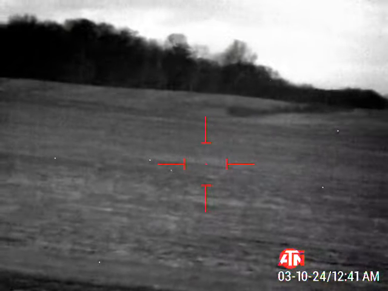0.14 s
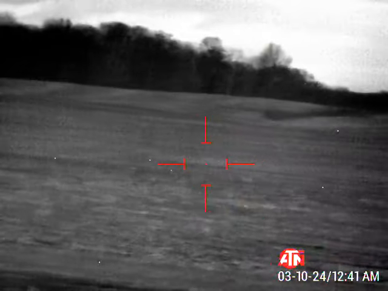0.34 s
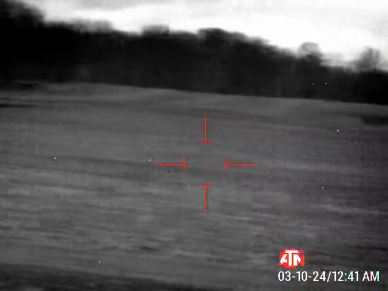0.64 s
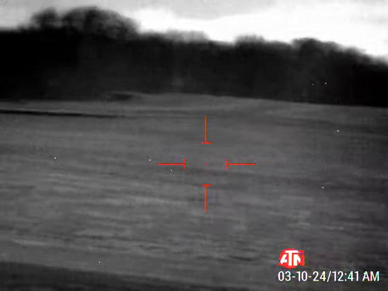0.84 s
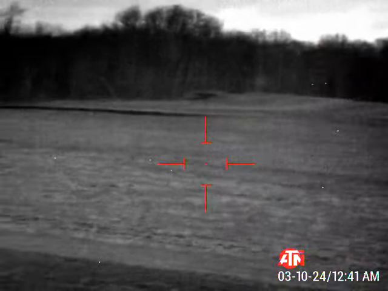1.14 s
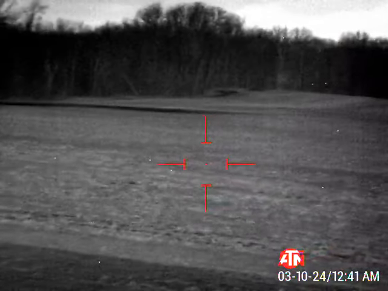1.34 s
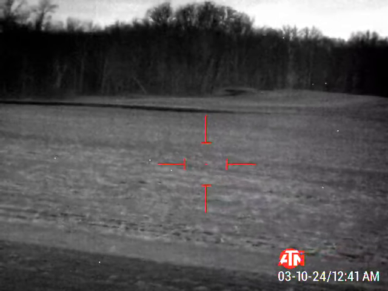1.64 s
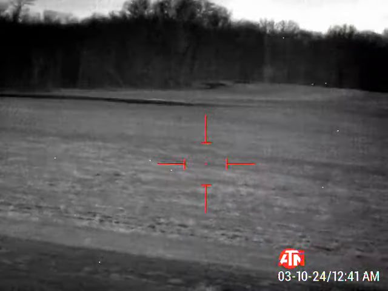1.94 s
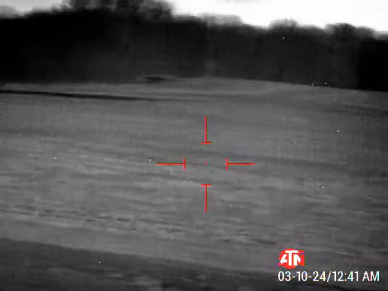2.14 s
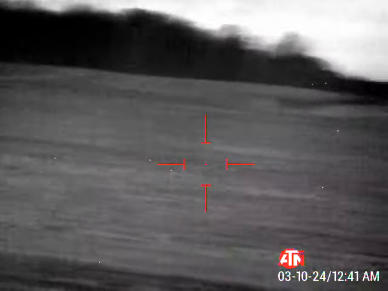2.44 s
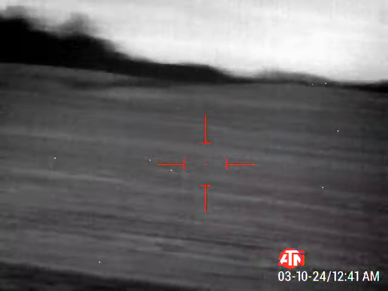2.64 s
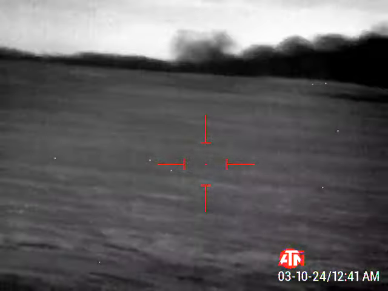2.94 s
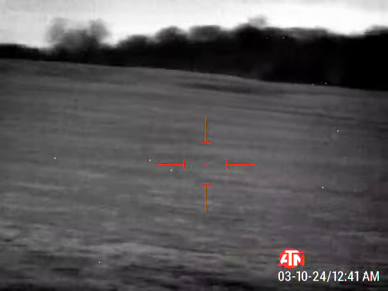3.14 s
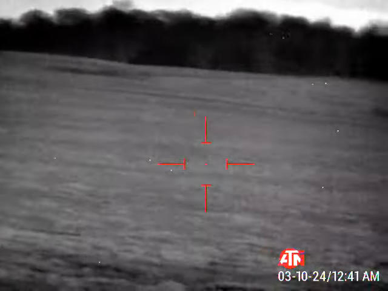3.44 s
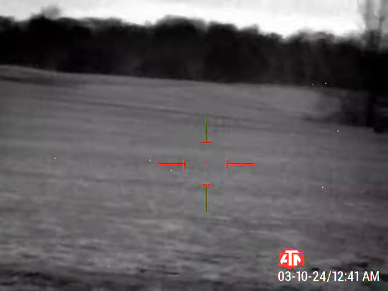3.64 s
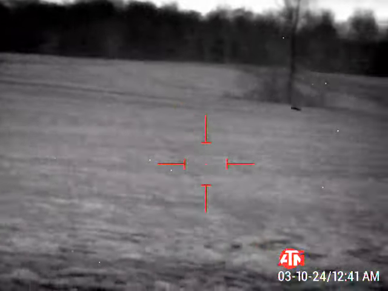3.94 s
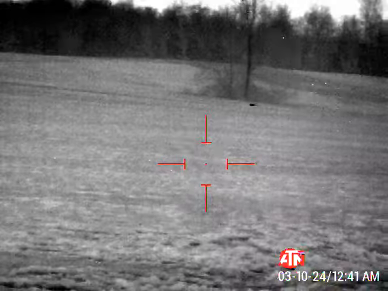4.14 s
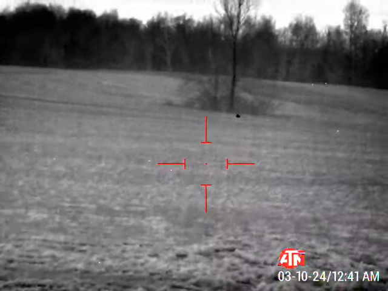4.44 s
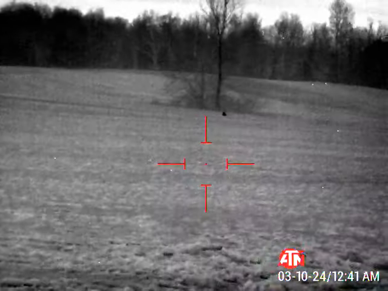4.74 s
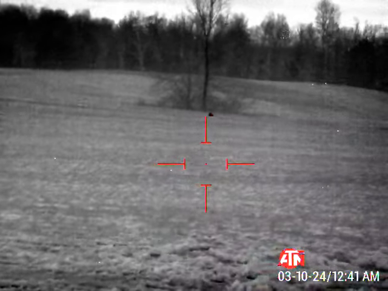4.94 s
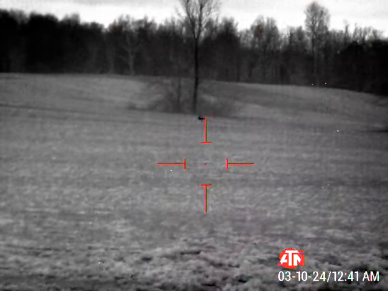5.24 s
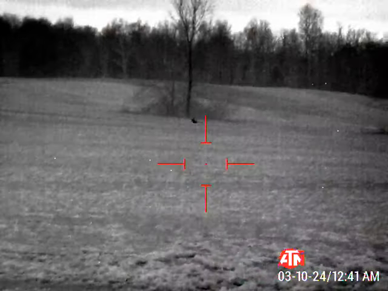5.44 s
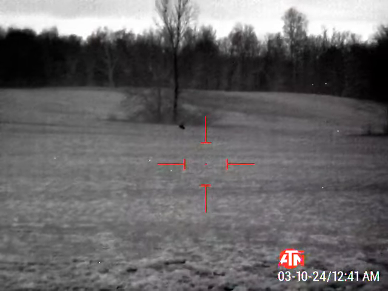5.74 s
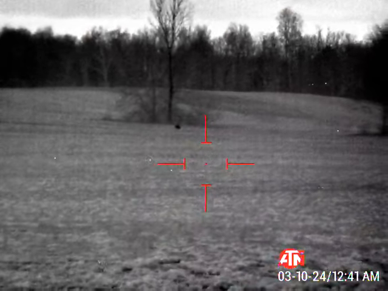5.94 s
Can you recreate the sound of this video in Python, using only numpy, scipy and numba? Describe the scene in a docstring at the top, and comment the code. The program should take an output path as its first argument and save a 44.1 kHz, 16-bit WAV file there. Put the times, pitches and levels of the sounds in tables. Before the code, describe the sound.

Outdoors at night in a field ringed by woods, the tail of a rifle shot sizzles and rolls away. A wounded coyote yelps some way off, short high arching cries with hoarse edges. Midway a muffled self-loading rifle fires once, close to the microphone, thumping and clattering. Its echo hisses over stubble, then rolls from the trees as the yelping continues. A small recorder ducks at loud sounds and its hiss swells back.

```python
"""A wounded coyote yelps across a night field ringed by woods: overtones of an arching pitch, hoarse at both ends.
A muffled self-loading rifle fires once, close to the microphone, as short bursts of thump and steel noise.
The bullet's shock wave sizzles back off the stubble with a sinking rumble, then the woods return a long, dulling roll.
The same echoes, from a shot fired just before the start, fill the first seconds.
The recorder's gain control ducks under loud sounds, so the roll and the hiss swell up between the yelps."""
import sys
import numpy as np
from scipy import signal
from scipy.fft import rfft, irfft, next_fast_len
from scipy.io import wavfile
from scipy.ndimage import uniform_filter1d, map_coordinates
from numba import njit

SR = 44100
rng = np.random.default_rng(int(sys.argv[2]) if len(sys.argv) > 2 else 0)


def generate_wav(sig):
    """Save sig (samples, or channels by samples) to the path in sys.argv[1] as 16-bit PCM at SR."""
    pcm = np.round(np.clip(np.atleast_2d(sig).T, -1, 1) * 32767).astype(np.int16)
    wavfile.write(sys.argv[1], SR, pcm)


N = 267863
T = np.arange(N) / SR  # time [s]

# firing times of the two shots, the first just before the start: [s]
SHOT_TIMES = [-0.13, 3.432]


def amp(db):
    """Decibels to amplitude."""
    return 10 ** (np.asarray(db) / 20)


def unit(x):
    """x scaled to rms 1."""
    return x / np.sqrt(np.mean(x ** 2) + 1e-20)


def ramp(x):
    """x held within 0-1."""
    return np.clip(x, 0, 1)


def along(points, hz):
    """(Hz, value) points read at hz on a log axis."""
    f, v = np.transpose(points)
    return np.interp(np.log(hz + 1), np.log(f + 1), v)


def curves(rows, t):
    """Each column after the time, read at times t."""
    s, *cols = np.transpose(rows)
    return [np.interp(t, s, c) for c in cols]


def during(start, length):
    """1 while a sound lasts, with soft edges."""
    inside = (T >= start) & (T <= start + length)
    return uniform_filter1d(inside * 1.0, size=400)


def wobble(rate):
    """A smooth random curve, rate knots a second."""
    knots = rng.standard_normal(int(N * rate / SR) + 4)
    return map_coordinates(knots, [T * rate])


def filtered(x, response):
    """x times a gain that depends on frequency."""
    m = next_fast_len(len(x) + 8192)
    gain = response(np.fft.rfftfreq(m, 1 / SR))
    return irfft(rfft(x, m) * gain, m)[:len(x)]


def noise(spectrum):
    """Coloured noise of rms 1."""
    return unit(filtered(rng.standard_normal(N), lambda hz: amp(along(spectrum, hz))))


def burst(spectrum, s, hold, t60):
    """A blast of coloured noise at time s that holds, then dies; its energy is that of its envelope."""
    t = T[:SR // 8]
    shape = amp(-60 * np.maximum(t - hold, 0) / t60)
    puff = np.pad(shape * rng.standard_normal(len(t)), (round(s * SR), N))[:N]
    blast = filtered(puff, lambda hz: amp(along(spectrum, hz)))
    return blast * np.linalg.norm(shape) / np.linalg.norm(blast)


def coyote():
    """Each yelp breaks in hoarsely, arches through a clear tone of overtones and breaks up again."""
    # one pitch arch a cry; where two overlap, the voice splits into two strands:
    # (start [s], length [s], level [dB], attack [s], first pitch [Hz], top pitch [Hz], last pitch [Hz],
    #  place of the top [share of length], hoarse onset [s], least roughness [0-1],
    #  brightness [dB per octave of overtone number], mouth region [Hz], mouth lift [dB])
    yelps = [ (1.141,.26,-19,0.074,610,705.4,578,0.47,0.087,0,0.5,3540,8.5),
             (1.56,0.3,-22,0.042,735,930,727,.64,0.11,0.16,2,3600,8.5),
             (2.073,0.29,-26,0.076,857,984,854,0.53,.05,0.17,4,4150,0),
             (2.134,.13,-32,0.06,904,1132,1070,0.69,0.017,0.4,13,3400,6),
             (2.598,0.3,-21,.11,762,1002,804,0.57,0.099,0.19,-3.5,3710,15),
             (2.865,.32,-47.5,0.019,766,804,770,0.23,.05,0.96,-8,4300,1),
             (3.158,0.23,-33.5,0.037,586,672,563,0.49,.07,0.3,-0.5,2900,-20),
             (4.156,0.25,-16.5,0.077,776,854,836,0.41,0.067,0.02,5,2680,2),
             (4.497,.09,-17,0.032,730,720,665,0.35,.05,0.9,6,4300,6),
             (4.837,.275,-19.5,0.044,1005,1244,1070,.83,.035,0.16,1,2550,4),
             (5.097,0.099,-38.5,0.083,1040,1045,965,0.16,.05,0.7,2,2550,3),
             (5.43,0.084,-31,0.043,690,713,644,0.22,0.063,.65,-14,1500,-2),
             (5.611,0.17,-17.5,0.097,751,895,724,0.56,0.0436,0.22,-1,3000,11.5),
             (5.748,0.17,-29,0.024,770,837,710,0.254,0.036,0.15,-5.5,3250,9.5)]
    # overtone strengths shaped by the throat: (frequency [Hz], relative level [dB])
    throat = [(400, -42), (950, -31.5), (1300, -8), (1900, 1), (2300, -5), (2800, 5), (3500, 3.5),
              (4000, 4.5), (4350, 12), (4750, -9), (5100, -17.5), (5800, -21.5), (6400, -44.5), (7500, -65)]
    # colour of the hoarse breath: (frequency [Hz], relative level [dB per Hz])
    rasp_colour = [(400, -46.5), (1300, -7), (2000, -7), (3000, 1.5), (3900, 3), (4350, -5), (4650, -0.5),
                   (5200, -12.5), (6200, -34.5), (9000, -68.5)]
    jitter, rough_jitter = 0.0078, 0.033  # pitch flutter, and its growth with roughness [share of pitch]
    mouth_width_hz, squeak_hz = 480, 4290

    out = np.zeros(N)
    flutter = wobble(220)
    squeak_cos = wobble(280) * np.cos(2 * np.pi * squeak_hz * T)
    squeak_sin = wobble(240) * np.sin(2 * np.pi * squeak_hz * T)
    squeak = unit(squeak_cos + squeak_sin)
    rasp = amp(-3) * noise(rasp_colour) + amp(-3) * squeak  # the hoarse voice rings one narrow resonance
    twinkle = [amp(4 * wobble(70)) for _ in range(10)]  # the air path shakes each overtone apart
    order = np.arange(1, len(twinkle) + 1)[:, None]
    for *shape, bright_db, mouth_hz, mouth_db in yelps:
        gate = during(*shape[:2])
        on = gate > 1e-6
        pitch, db, rough = cry(T[on], *shape)
        rough = ramp(rough)
        fluttering = pitch * (1 + (jitter + rough_jitter * rough) * flutter[on])
        phase = 2 * np.pi * np.cumsum(fluttering) / SR
        # the jaw lifts or hollows one region
        mouth = mouth_db * np.exp(-((order * pitch - mouth_hz) / mouth_width_hz) ** 2)
        sizes = amp(along(throat, order * pitch) + mouth + bright_db * np.log2(order))
        sizes = sizes / np.sqrt(np.sum(sizes ** 2, axis=0) / 2)
        shaken = sizes * np.array([w[on] for w in twinkle])
        tone = np.sum(shaken * np.sin(order * phase), axis=0)
        hoarse = rasp[on] * (1 + 0.098 * np.cos(phase))  # air escapes once a cycle
        voice = np.sqrt(1 - rough ** 2) * tone + rough * hoarse
        out[on] += gate[on] * amp(db) * voice
    return out


def cry(t, start, length, db, attack, first, top, last, top_at, hoarse_s, rough):
    """Pitch [Hz] arches, level [dB] swells and fades, roughness is greatest at both ends."""
    rise_bend, fall_bend = 1.55, 2.2  # curvature of the pitch arch
    break_s, break_length_s, break_leap = 2.188, 0.039, 0.17  # the voice cracks upward once
    release_s, fade_db, hoarse_end_s = 0.067, 19, 0.089  # how a cry ends; the fade depth serves both ends

    age, left = t - start, start + length - t
    rise = ramp(1 - age / length / top_at)
    fall = ramp(1 - left / length / (1 - top_at))
    pitch = top + (first - top) * rise ** rise_bend + (last - top) * fall ** fall_bend
    leap = 1 + break_leap * np.exp(-np.abs((t - break_s) / break_length_s) ** 3)
    fade = fade_db * (ramp(1 - age / attack) ** 2 + ramp(1 - left / release_s) ** 2)
    clear = np.minimum(age / hoarse_s, left / hoarse_end_s)
    return pitch * leap, db - fade, np.maximum(rough, 1 - clear ** 2)


def among_trees(x):
    """Nearby brush blurs the cry; the far trees smear it into a thin, high tail."""
    # how long the far trees ring: (frequency [Hz], time to fall 60 dB [s])
    tree_t60 = [(300, 0.47), (3600, 0.67), (4300, 0.89), (5000, 0.73), (8000, 0.11)]
    hz, t, z = signal.stft(rng.standard_normal(SR), SR, nperseg=256)
    decay = amp(-60 * t / along(tree_t60, hz)[:, None])
    tail = signal.istft(z * decay, SR, nperseg=256)[1][:SR]
    # the brush swells in linearly against a decay of 60 dB per 0.07 s
    near = rng.standard_normal(SR) * amp(-60 * T[:SR] / 0.07) * T[:SR]
    paths = amp(-12) * near / np.linalg.norm(near) + amp(-25) * tail / np.linalg.norm(tail)
    return x + signal.fftconvolve(x, paths)[:N]


def rifle():
    """Gas thumps and steel clashes: the shot, the bolt running back and home, the trigger resetting."""
    # the shot and the cycling of the action, close to the microphone:
    # (time [s], thump level [dB], steel level [dB], hold [s], time to fall 60 dB [s])
    blows = [(0.052,-16.5,-9.5,0.00099,.024), (3.433,-18.5,-33,0.0012,.009), (3.4371,-9,-22,0.00064,0.0051),
             (3.439,-16.5,-4,0.00088,.012), (3.4416,-21,-1.5,.0025,.011), (3.443,-2,-10,0.00065,0.008),
             (3.452,-18,-15,0.017,.05), (3.4698,-15.5,-11,0.0026,0.11), (3.5093,-18.5,-4,.011,0.042),
             (3.5997,-15.5,-9.5,0.00083,0.01)]
    # colour of the gas thump: (frequency [Hz], relative level [dB per Hz])
    thump = [(40, -29.5), (110, -35.5), (250, -9.5), (520, -5), (1000, -0.5), (1700, -11.5), (2800, -16),
             (5000, -30), (15000, -58.5)]
    # colour of the steel clash: (frequency [Hz], relative level [dB per Hz])
    steel = [(200, -34), (1500, -13), (3000, -15.5), (3800, -1.5), (4450, -2), (5200, -6.5), (6200, -6),
             (7500, -16), (10000, -23.5), (15000, -27.5)]
    out = np.zeros(N)
    for s, thump_db, steel_db, hold, t60 in blows:
        out += amp(thump_db) * burst(thump, s, hold, t60)
        out += amp(steel_db) * burst(steel, s, hold, t60)
    return out


def field():
    """Stubble scatters the passing shock wave as a sizzle, with a low rumble that sinks as the bullet recedes."""
    # scatter off the open ground: (time after the shot [s], sizzle level [dB], rumble level [dB])
    scatter = [(.02,-16,-31), (.15,-23,-30), (.3,-20,-29), (0.602,-15,-37), (.7,-24,-46), (1.08,-23.5,-45),
               (1.35,-62.5,-51.5)]
    # colour of the sizzle: (frequency [Hz], relative level [dB per Hz])
    sizzle_colour = [(100, -35.5), (400, -37), (490, -10.5), (580, -20.5), (1500, -17.5), (2500, -14),
                     (3300, -10.5), (4000, -3), (4600, 0.5), (5100, -9), (6500, -27), (8000, -40),
                     (10000, -53), (15000, -74)]
    end_hz, drop_hz, sink_s, width_octaves = 185, 710, 0.24, 0.43  # the rumble's sinking band

    out = np.zeros(N)
    for shot in SHOT_TIMES:
        def centre_hz(t):
            """The rumble's pitch sinks exponentially after the shot."""
            return end_hz + drop_hz * np.exp(-np.maximum(t - shot, 0) / sink_s)

        sizzle_db, rumble_db = curves(scatter, T - shot)
        sizzle = unit(noise(sizzle_colour) * amp(wobble(500)))  # grainy
        hz, t, z = signal.stft(rng.standard_normal(N), SR, nperseg=2048)
        octaves = np.log2((hz[:, None] + 1) / centre_hz(t))
        band = np.exp(-(octaves / width_octaves) ** 2 / 2)
        banded = signal.istft(z * band, SR, nperseg=2048)[1][:N]
        rumble = unit(banded / np.sqrt(centre_hz(T)))  # evens out the changing bandwidth
        gate = during(shot + scatter[0][0], scatter[-1][0])
        out += gate * (amp(sizzle_db) * sizzle + amp(rumble_db) * rumble)
    return out


def woods(shot):
    """Countless trunks return the report as a grainy roll; it starts thin and bright, and comes duller with time."""
    # near tree line, then deep woods: (delay [s], swell [s], hold [s], level [dB], fade [dB per s])
    tree_lines = [(0.887,0.15,0.07,-22.5,25), (1.051,0.86,0.39,-33,10.5)]
    # colour of the roll before its moving tilt: (frequency [Hz], relative level [dB per Hz])
    roll_colour = [(30, -38.5), (80, -36), (130, -22.5), (190, -21.5), (330, -16.5), (450, -1.5),
                   (600, 0.5), (1000, 1), (1400, -0.5), (2100, -1), (3200, -7), (4600, -10.5),
                   (5400, -28.5), (7500, -68), (15000, -84.5)]
    # treble tilt above the pivot: the late value, and the extra that dies away [dB per octave]
    last_tilt_db, early_tilt_db, dulling_s, pivot_hz = -7.5, 15.5, 0.59, 700

    grain = 1.5 * wobble(600) + 1.58 * wobble(60)  # fine grain and slower lumps [dB]
    returns = rng.standard_normal(N) * amp(grain)
    roll = filtered(returns, lambda hz: amp(along(roll_colour, hz)))
    roll = roll / np.std(filtered(roll, lambda hz: (hz > 400) & (hz < 1200)))
    hz, t, z = signal.stft(roll, SR, nperseg=512)
    octaves = np.log2(np.maximum(hz, 1) / pivot_hz)[:, None]
    age = np.maximum(t - shot - tree_lines[0][0], 0)
    tilt = last_tilt_db + early_tilt_db * np.exp(-age / dulling_s)
    bass_db = 2 * np.clip(octaves, -1, 0) * np.maximum(tilt, 0)  # the first, bright returns carry little bass
    tilted = z * amp(np.maximum(octaves, 0) * tilt + bass_db)
    roll = signal.istft(tilted, SR, nperseg=512)[1][:N]
    swells = []
    for delay, swell, hold, db, fade in tree_lines:
        since = T - shot - delay
        fading_db = db - fade * np.maximum(since - swell - hold, 0)
        swells.append(ramp(since / swell) * amp(fading_db))
    return np.linalg.norm(swells, axis=0) * roll


def trunk_slaps():
    """Single trunks throw back sharp cracks, each a short noise burst."""
    # sharp returns off trunks: (time [s], level [dB], hold [s])
    slaps = [(0.587,-32,0.0013), (0.649,-27,.001), (0.7,-27,0.0032), (0.791,-31,0.0034),
             (0.942,-6.5,0.0014), (1.172,-25,0.0027), (4.033,-23.5,0.0039), (4.362,-13,.002),
             (4.699,-16,0.0027), (4.7228,-7,0.00088)]
    # colour of a returned crack: (frequency [Hz], relative level [dB per Hz])
    crack = [(60, -33), (200, -18), (500, -9.5), (900, 1.5), (1500, 3), (2100, 5), (3200, -12.5),
             (4600, -6.5), (5500, -33), (9000, -43.5), (15000, -50)]
    return sum(amp(db) * burst(crack, s, hold, t60=0.017) for s, db, hold in slaps)


def hiss():
    """Steady microphone hiss, and a faint electrical hum whose partials waver slowly in level."""
    # colour of the hiss: (frequency [Hz], relative level [dB per Hz])
    hiss_colour = [(30, 4), (100, 2.5), (180, 4.5), (400, 17), (2000, -1.5), (6000, 0.5), (10000, -4.5),
                   (15000, -6.5)]
    # partials of the hum: (frequency [Hz], mean peak level over -63 dB [dB])
    hum_partials = [(180, 1), (240, -2), (300, 2), (490, 6.5)]
    hum = np.zeros(N)
    for hz, db in hum_partials:
        hum += amp(db - 1.5 * wobble(4.9)) * np.sin(2 * np.pi * hz * T)
    return amp(-55) * noise(hiss_colour) + amp(-63) * hum


@njit
def chase(wanted, up, down):
    """Follow a curve, rising and falling at different speeds."""
    out = wanted.copy()
    for i in range(1, len(out)):
        gap = wanted[i] - out[i - 1]
        out[i] = out[i - 1] + gap * (up if gap > 0 else down)
    return out


def gain_control(x):
    """Loud sounds duck the gain; it creeps back after an overload, and starts low from the earlier shot."""
    level_db, squeeze = -29, 1.026  # threshold, and dB of cut per dB above it
    attack_s, release_s = 0.0091, 0.038
    lag_s = 0.0041  # it reacts late, so sudden swells overshoot
    overload_db, overload_slope = -9, 8  # threshold, and dB of duck per dB above it
    duck_db, recover_db_per_s = 26, 24  # deepest duck, and its recovery

    db = 10 * np.log10(np.abs(uniform_filter1d(x ** 2, size=300)) + 1e-12)
    db = np.interp(T - lag_s, T, db)
    overload = np.clip(overload_slope * (db - overload_db), 0, duck_db)
    # a running maximum against a rising line makes the duck recover steadily
    back = recover_db_per_s * T
    duck = np.maximum.accumulate(np.maximum(overload + back, duck_db)) - back
    wanted_cut = np.maximum(squeeze * (db - level_db), duck)
    cut_db = chase(wanted_cut, 1 / (attack_s * SR), 1 / (release_s * SR))
    return x * amp(-cut_db)


def scene():
    """Coyote, rifle and each shot's echoes over the hiss, as they reach the microphone."""
    rolls = sum(woods(shot) for shot in SHOT_TIMES)
    return (among_trees(coyote()) + rifle() + field() + rolls + trunk_slaps() + hiss())[None]


def record(dry):
    """The small recorder rides the gain, rounds off peaks, drops the bass and cuts all above its band limit."""
    ceiling, bass_hz, top_hz = 0.72, 160, 15400  # ceiling in full scale before the filters
    x = gain_control(dry[0])
    clipped = x / (1 + (x / ceiling) ** 4) ** (1 / 4)
    thin = signal.sosfilt(signal.butter(2, bass_hz, "high", fs=SR, output="sos"), clipped)
    return filtered(thin, lambda hz: hz < top_hz)[None]


dry = scene()
out = record(dry)
generate_wav(out)
```